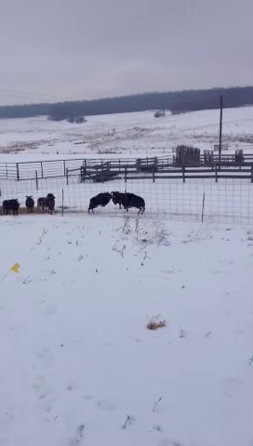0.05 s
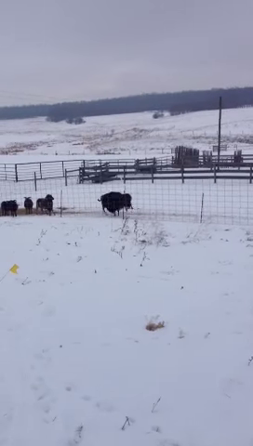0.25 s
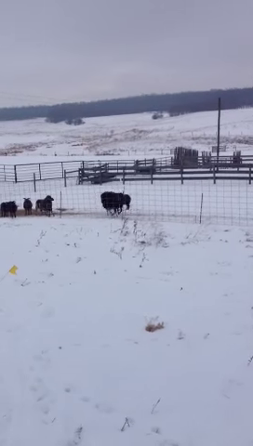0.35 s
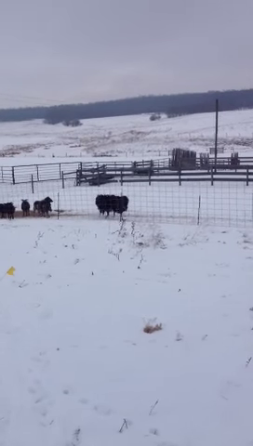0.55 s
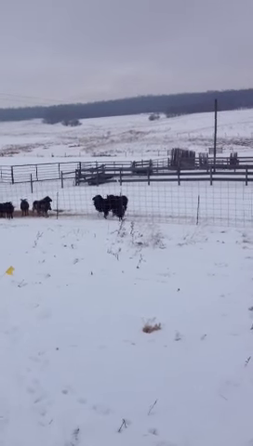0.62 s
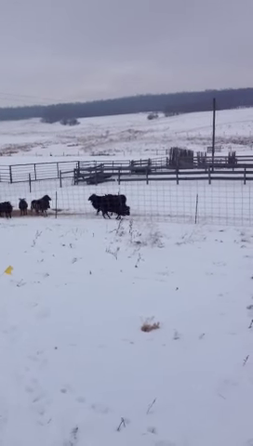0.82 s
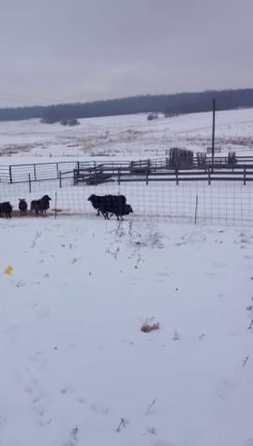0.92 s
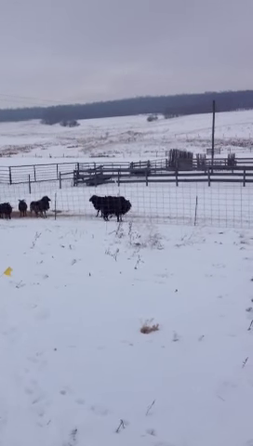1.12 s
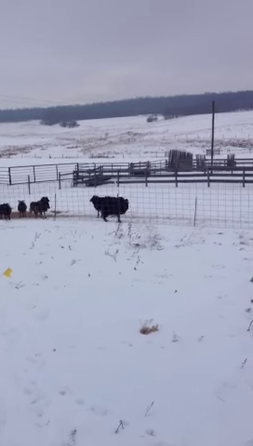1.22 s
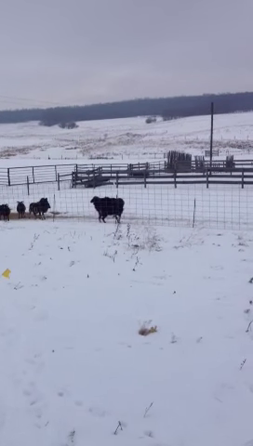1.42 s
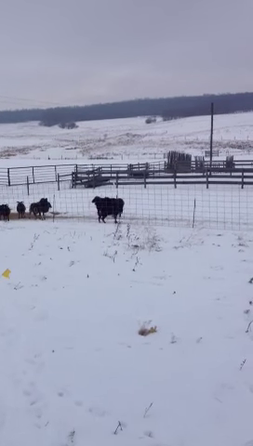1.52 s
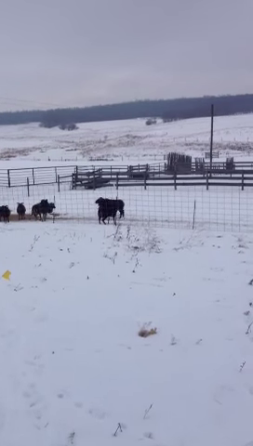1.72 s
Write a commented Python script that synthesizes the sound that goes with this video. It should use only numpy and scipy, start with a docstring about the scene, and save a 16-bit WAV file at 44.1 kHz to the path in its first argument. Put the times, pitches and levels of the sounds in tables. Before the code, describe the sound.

A single sharp horn clash some way off, a slapping echo, then faint hoof scuffs in snow

```python
"""Low wind (shaped noise), a thin hiss and a faint far drone run throughout; soft crackly rustles come and go.
Then two rams butt heads once, some way off in a snowy field: a quick cluster of clicks makes the horns crack
and ring, and low decaying tones make the bodies thud. Fences and rough ground smear the sound into dull echoes,
and a farm building throws back one clear slap. Afterwards hooves scuff the snow, as swells of crackling noise,
and one hoof stamps, as a single shaped click."""
import sys
import numpy as np
from scipy import signal
from scipy.fft import rfft, irfft
from scipy.io import wavfile

SR = 44100
rng = np.random.default_rng(int(sys.argv[2]) if len(sys.argv) > 2 else 0)


def output_pcm(signal):
    """Save a mono or channel-first signal as 16-bit PCM at the path in sys.argv[1].

    Samples are clipped to [-1, 1] before scaling.
    """
    pcm = np.clip(np.atleast_2d(signal).T, -1, 1) * 32767
    wavfile.write(sys.argv[1], SR, np.round(pcm).astype(np.int16))


N = 77175
T = np.arange(N) / SR  # time in seconds
PUFF_N = 4096  # samples in a short sound, about 0.09 s

# Tone of the wind. Each row: frequency in Hz, relative level in dB.
WIND_TONE = [(25, -43.5), (60, -35.5), (100, -14), (150, -5.5), (200, -3.5), (280, 2), (350, -3),
             (420, -5.5), (620, -3.5), (800, -10.5), (1100, -15), (1600, -27), (3300, -61)]
# Strength of the wind over time. Each row: time in seconds, level in dB.
WIND_LEVEL = [(0, -58.5), (.5, -59.5), (.9, -57), (1.3, -60.5), (1.75, -60)]
# Tone of the hiss. Each row: frequency in Hz, relative level in dB.
HISS_TONE = [(300, -33), (1000, -2.5), (1600, 1.5), (3000, -1), (6500, -1), (10000, -5), (13000, -2.5),
             (15500, -4.5)]
# Strength of the hiss over time. Each row: time in seconds, level in dB.
HISS_LEVEL = [(0, -61), (.5, -64), (.9, -66.5), (1.3, -67.5), (1.75, -67)]
# Far drone. Each row: frequency in Hz, width in Hz, level in dB.
DRONE_NOTES = [(197.3, 2.2, -65), (283.2, 16, -69), (341.4, 10, -72)]
# Soft nearby rustles. Each row: middle in seconds, half-length in seconds, level in dB.
RUSTLE_TIMES = [(0.033, 0.036, -52.5), (0.097, .012, -61), (0.153, .12, -68), (0.229, .04, -59.5),
                (0.574, 0.033, -66), (0.714, 0.02, -60.5), (0.757, 0.031, -62), (0.875, .07, -67.5)]
# Tone of the rustles. Each row: frequency in Hz, relative level in dB.
RUSTLE_TONE = [(200, -47), (900, -6), (2500, 0.5), (5000, 0.5), (9000, -1.5), (14000, -5), (16000, -16)]
# Horn contacts. Each row: start in seconds, relative level in dB, treble edge in Hz,
# crunch decay in seconds, extra level sent to the wall in dB.
HORN_CONTACTS = [(0.2241, -2.4, 2200, .0007, 9), (0.2261, -5, 7920, 0.0005, 0),
                 (.2270, 5, 1300, .0006, -16), (.2285, -6, 2500, .0004, -6),
                 (0.2334, -5, 10000, 0.00084, -10), (0.2339, -4.5, 7000, .001, -28),
                 (.2379, -9.5, 7000, .0005, -14), (0.2405, -15, 3000, .001, -12),
                 (0.2544, -16.5, 4000, .0015, -11), (0.2628, -32.5, 4560, .001, 2)]
# Tone of the dry crack of horn on horn. Each row: frequency in Hz, relative level in dB.
CRACK_TONE = [(100, -38), (480, -28), (590, -3), (700, -5.5), (790, 0.5), (900, -5.5), (1070, 0.5),
              (1450, 3.5), (1850, -4), (2200, 1), (2600, 4), (3100, -8.5), (4100, 1), (4900, -9.5),
              (5800, -5.5), (7000, -12), (10000, -21.5), (12300, -18), (15500, -28)]
# Ringing of horn and skull. Each row: frequency in Hz, relative level in dB, time to fall 60 dB in seconds.
HORN_RINGS = [(770, -24.5, 0.056), (1070, -23.5, 0.021), (1450, -29.5, 0.044), (2188, -20, 0.026),
              (2620, -18.5, 0.014), (3124, -45, .025), (4000, -42, 0.0084), (4680, -30.5, .06),
              (6100, -19.5, 0.024)]
# Colliding bodies. Each row: start in seconds, frequency in Hz, level in dB before the soft rise,
# time to fall 60 dB in seconds.
BODY_THUDS = [(.227, 285, -37.5, 0.084), (0.237, 135.9, -42, 0.097), (.251, 197.1, -41.5, 0.081)]
# Tone of the field's long tail. Each row: frequency in Hz, relative level in dB.
FIELD_TONE = [(200, -34.5), (700, -26.5), (1500, -21.5), (2200, -25.5), (3000, -24.5), (4700, -15),
              (6000, -21.5), (8000, -11.5), (15000, -6)]
# How fast that tail dies. Each row: frequency in Hz, time to fall 60 dB in seconds.
FIELD_DECAY = [(200, 0.69), (1200, .65), (2500, 0.97), (5000, .42), (15000, 0.14)]
# Echoes from fences and rough ground. Each row: delay in seconds, level in dB before the treble cut,
# treble edge in Hz, smear decay in seconds.
FIELD_ECHOES = [(.083, -26, 1700, 0.0062), (.102, -29.5, 2200, 0.0026), (.119, -29, 5000, 0.005),
                (.138, -30.5, 2020, 0.0084), (.167, -28.5, 1100, 0.0022), (.193, -31.5, 1000, 0.0026),
                (.214, -32, 900, 0.0026)]
# Tone of the slap from the wall. Each row: frequency in Hz, relative level in dB.
SLAP_TONE = [(300, -14), (700, -2.5), (1100, 2.5), (2100, -4), (2700, -26), (4000, -3), (5000, 3),
             (8000, -11.5), (15000, -2.5)]
# Tone of the small reflections around the slap. Each row: frequency in Hz, relative level in dB.
BLOOM_TONE = [(300, -24), (1000, -7.5), (2500, -13.5), (4500, -4), (8000, 1), (15000, 7)]
# Hoof scuffs. Each row: middle in seconds, half-length in seconds, level in dB, treble edge in Hz.
HOOF_SCUFFS = [(0.64, 0.0036, -58.5, 6000), (0.886, 0.033, -60.5, 1700), (0.93, 0.023, -62.5, 2200),
               (1.099, 0.065, -69, 2000), (1.27, 0.09, -70.5, 1304)]
# Tone of one hoof stamp. Each row: frequency in Hz, relative level in dB.
STAMP_TONE = [(100, -31.5), (500, 3.5), (850, 8), (1500, -9), (3000, -19), (8000, -19), (15000, -28)]

CRUNCH_DB = -5.5  # crunch beside the click of each contact
CLASH_DB, RING_DB = -40.5, -9.5  # average level of the horn sound; ring beside the crack
NEAR_DB, NEAR_T60_S = -15.5, 0.092  # scatter from close by
SLAP_DELAY_S, SLAP_DB = .1084, -20.5
BLOOM_DB, BLOOM_DECAY_S = -17, 0.037
STAMP_S, STAMP_DB = .929, -29.5
EDGE_HZ = 15600  # top of the whole sound


def amp(db):
    """Turns decibels into gain."""
    return 10 ** (np.asarray(db) / 20)


def unit(x):
    """Scales a sound to an average (rms) level of 1."""
    return x / np.sqrt(np.mean(x ** 2) + 1e-20)


def read(points, hz):
    """Reads between table rows, with frequency on a log scale."""
    f, value = np.transpose(points)
    return np.interp(np.log(hz + 1), np.log(f + 1), value)


def add(mix, s, sound):
    """Mixes a sound in at time s, in seconds."""
    part = mix[round(s * SR):][:len(sound)]
    part += sound[:len(part)]


def cut(x, hz, kind="low", order=2):
    """Removes what lies above hz ("low") or below it ("high")."""
    edge_hz = min(hz, .45 * SR)
    return signal.sosfilt(signal.butter(order, edge_hz, kind, fs=SR, output="sos"), x)


def colour(x, points):
    """Shapes the tone of a sound with a table, at rms 1."""
    gain = amp(read(points, np.fft.rfftfreq(N, 1 / SR)))
    return unit(irfft(rfft(x) * gain, N))


def burst(decay_s):
    """A dying puff of noise with energy 1."""
    x = rng.standard_normal(PUFF_N) * np.exp(-T[:PUFF_N] / decay_s)
    return x / np.linalg.norm(x)


def causal(points):
    """The sharpest click with a table's tone (minimum phase), with energy 1."""
    log_gain = np.log(amp(read(points, abs(np.fft.fftfreq(PUFF_N, 1 / SR)))))
    x = np.fft.ifft(np.exp(np.conj(signal.hilbert(log_gain)))).real
    return x / np.linalg.norm(x)


def grains(spread_db):
    """Dense crackle: noise whose samples get uneven random boosts."""
    noise = rng.standard_normal(N)
    boost_db = spread_db * np.minimum(rng.exponential(1, N), 4)
    return unit(noise * amp(boost_db))


def swell(s, length):
    """A smooth bump around time s."""
    return np.exp(-2 * ((T - s) / length) ** 2)


def steady_noise(tone, level):
    """Noise with a fixed tone and a slowly changing strength."""
    return colour(rng.standard_normal(N), tone) * amp(np.interp(T, *np.transpose(level)))


def wind():
    """A quiet low rush: noise kept mostly in the low range."""
    return steady_noise(WIND_TONE, WIND_LEVEL)


def hiss():
    """A thin hiss: noise kept mostly in the high range."""
    return steady_noise(HISS_TONE, HISS_LEVEL)


def drone():
    """Narrow bands of noise, heard as faint wavering notes."""
    out = np.zeros(N)
    f = np.fft.rfftfreq(N, 1 / SR)
    for hz, width, db in DRONE_NOTES:
        peak = 1 / (1 + (2 * (f - hz) / width) ** 2)
        out += amp(db) * unit(irfft(rfft(rng.standard_normal(N)) * peak, N))
    return out


def rustles():
    """Something rustles softly nearby: fine crackle in short swells."""
    strength = sum(amp(db) * swell(s, length) for s, length, db in RUSTLE_TIMES)
    return colour(grains(spread_db=5.5), RUSTLE_TONE) * strength


def horns():
    """Each contact, a click with a brief crunch, sets off a crack and a ring, sent forward and to the wall."""
    forward, to_wall = np.zeros((2, N))
    for s, db, bright_hz, crunch_s, wall_db in HORN_CONTACTS:
        push = amp(CRUNCH_DB) * burst(crunch_s)
        push[0] += 1  # the click
        push = amp(db) * cut(push, bright_hz, order=1)
        add(forward, s, push)
        add(to_wall, s, amp(wall_db) * push)
    t = T[:PUFF_N]
    ring = sum(amp(db - 60 * t / t60) * np.cos(2 * np.pi * hz * t) for hz, db, t60 in HORN_RINGS)
    body = causal(CRACK_TONE) + amp(RING_DB) * cut(ring, 310, "high")
    out = signal.fftconvolve([forward, to_wall], body[None], axes=1)[:, :N]
    return amp(CLASH_DB) * out / out[0].std()


def bodies(rise_s=.004):
    """Dull low thuds as the weight follows the horns: dying tones with a soft start."""
    out = np.zeros(N)
    rise = 1 - np.exp(-T / rise_s)
    for s, hz, db, t60 in BODY_THUDS:
        add(out, s, amp(db - 60 * T / t60) * rise * np.sin(2 * np.pi * hz * T))
    return out


def field(x):
    """Spreads a sound over many paths: near scatter, smeared dull echoes and a thin long tail."""
    hz, t, z = signal.stft(rng.standard_normal(N), SR, nperseg=256)
    t60 = read(FIELD_DECAY, hz)[:, None]
    even_energy = np.sqrt(2 * np.log(1000) / (t60 * SR))  # long and short decays carry equal energy
    z = z * amp(read(FIELD_TONE, hz)[:, None] - 60 * t / t60) * even_energy
    paths = signal.istft(z, SR, nperseg=256)[1][:N]
    add(paths, .002, amp(NEAR_DB) * burst(NEAR_T60_S / np.log(1000)))
    for delay, db, edge_hz, smear_s in FIELD_ECHOES:
        add(paths, delay, amp(db) * cut(burst(smear_s), edge_hz, order=1))
    return signal.fftconvolve(x, paths)[:N]


def wall(x):
    """One clear slap from a building, with a bright spray of small reflections."""
    slap = amp(SLAP_DB) * causal(SLAP_TONE)
    bloom = signal.fftconvolve(burst(BLOOM_DECAY_S), causal(BLOOM_TONE))[:PUFF_N]
    paths = slap + amp(BLOOM_DB) * bloom
    out = np.zeros(N)
    add(out, SLAP_DELAY_S, signal.fftconvolve(x, paths))
    return out


def hooves(low_hz=550):
    """Hooves scuff the snow, as swells of crackle, and one stamps, as a shaped click."""
    crunch = cut(grains(spread_db=3), low_hz, "high")
    out = np.zeros(N)
    for s, length, db, hz in HOOF_SCUFFS:
        out += amp(db) * swell(s, length) * unit(cut(crunch, hz))
    add(out, STAMP_S, amp(STAMP_DB) * causal(STAMP_TONE))
    return out


def scene():
    """The clash and its echoes in the open field, with the sounds around it."""
    crack, to_wall = horns()
    clash = crack + bodies()
    echoes = wall(to_wall) + field(clash)
    movement = hooves() + rustles()
    background = wind() + hiss() + drone()
    return (clash + echoes + movement + background)[None]


def record(dry):
    """The recorder's band limit: a steep filter removes the highest treble."""
    low_pass = signal.firwin(511, EDGE_HZ, window=("kaiser", 9), fs=SR)
    return signal.oaconvolve(dry, low_pass[None], "same")


dry = scene()
out = record(dry)
output_pcm(out)
```